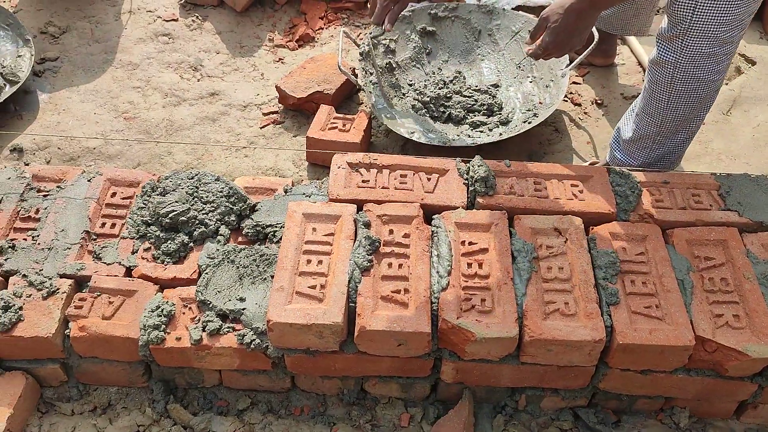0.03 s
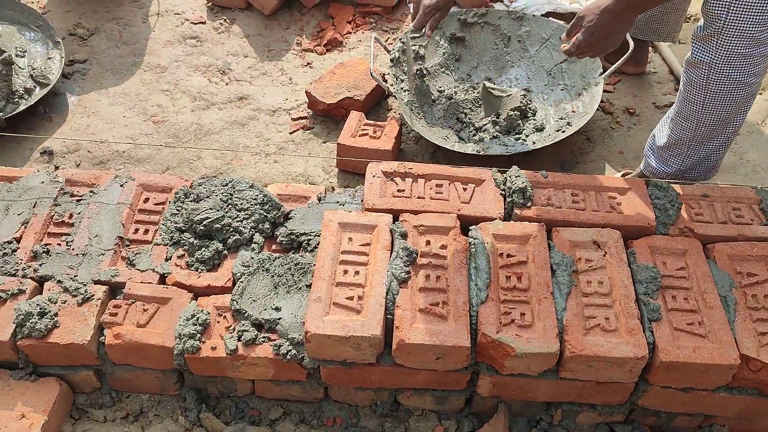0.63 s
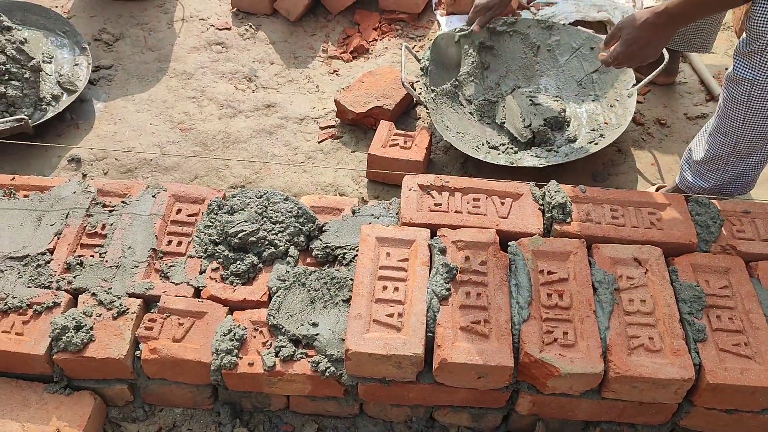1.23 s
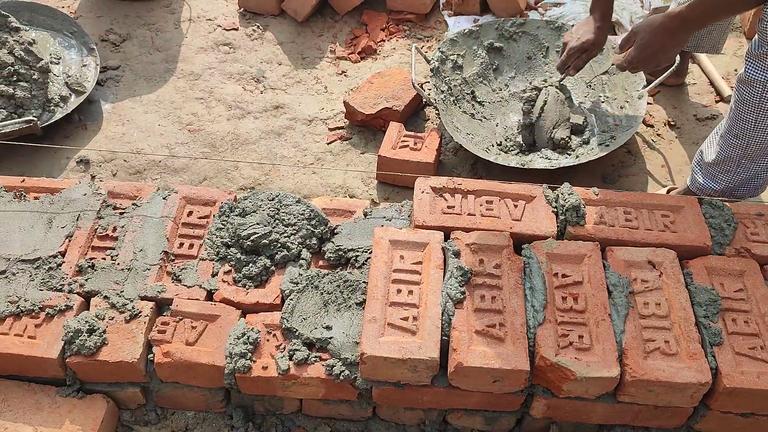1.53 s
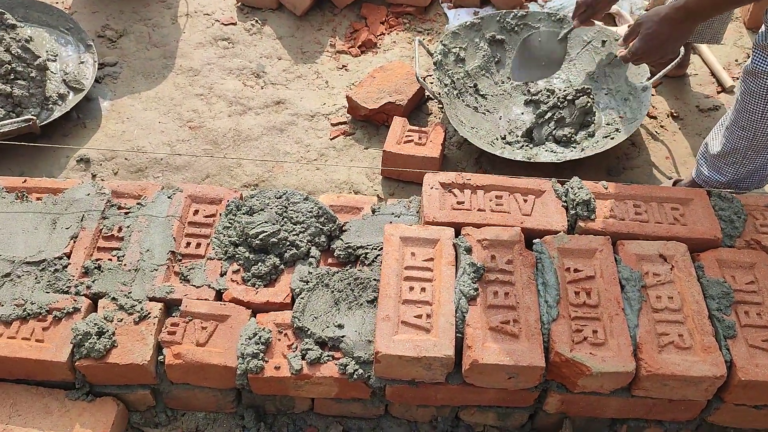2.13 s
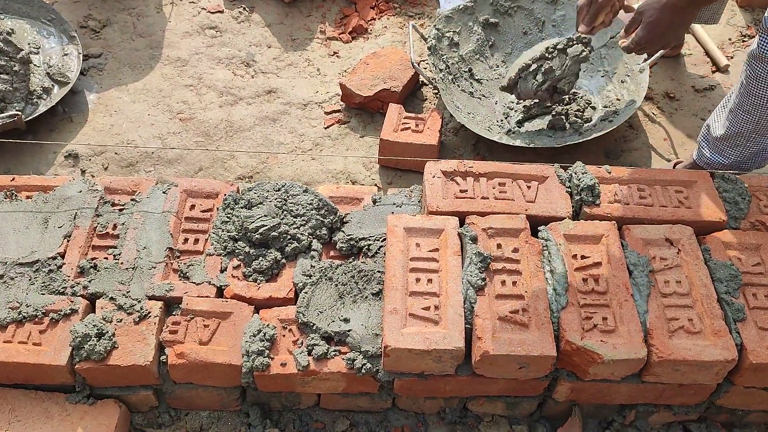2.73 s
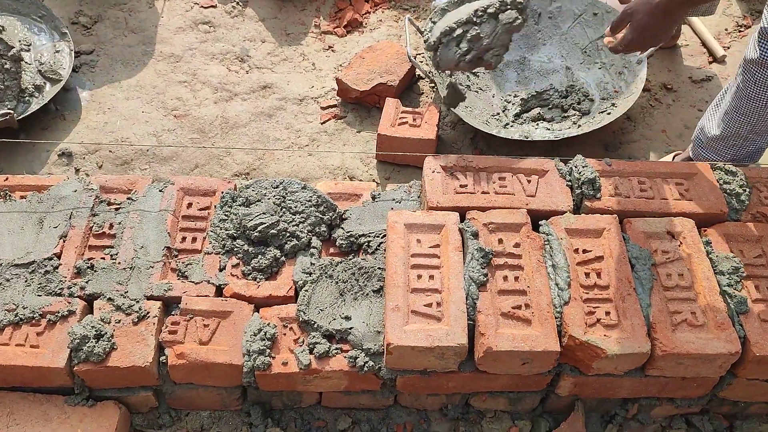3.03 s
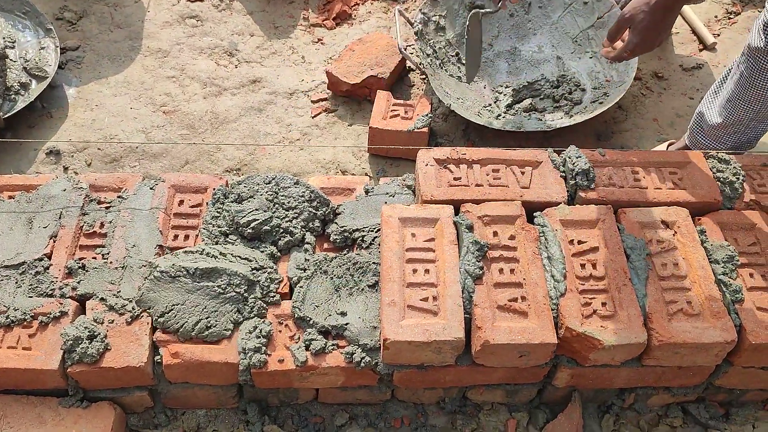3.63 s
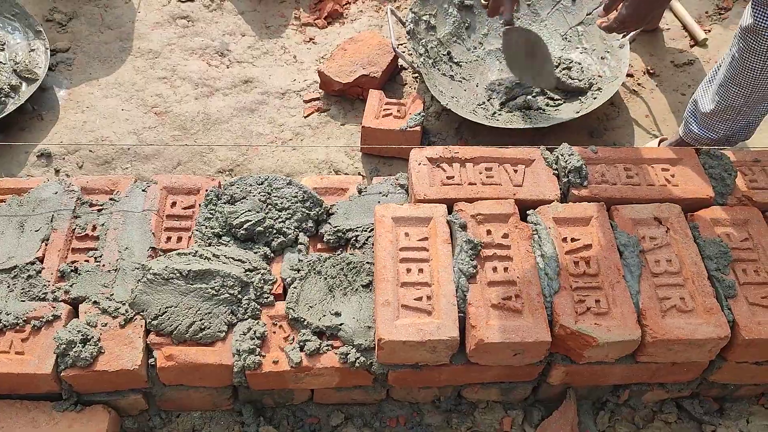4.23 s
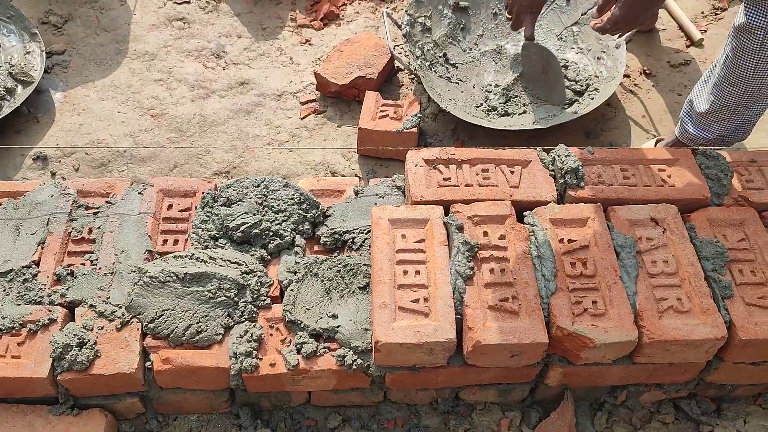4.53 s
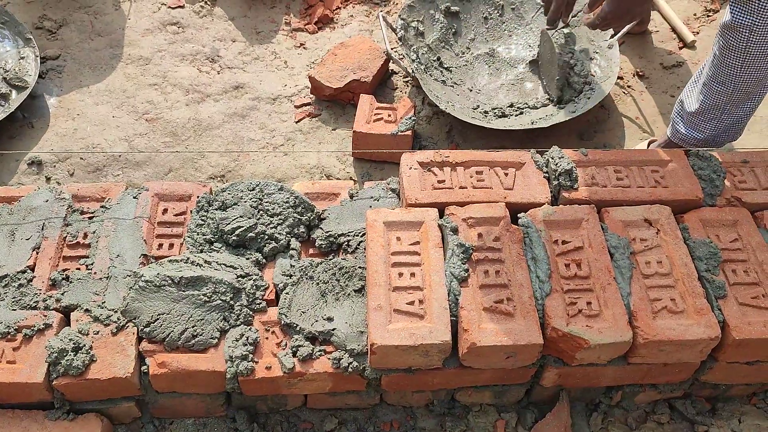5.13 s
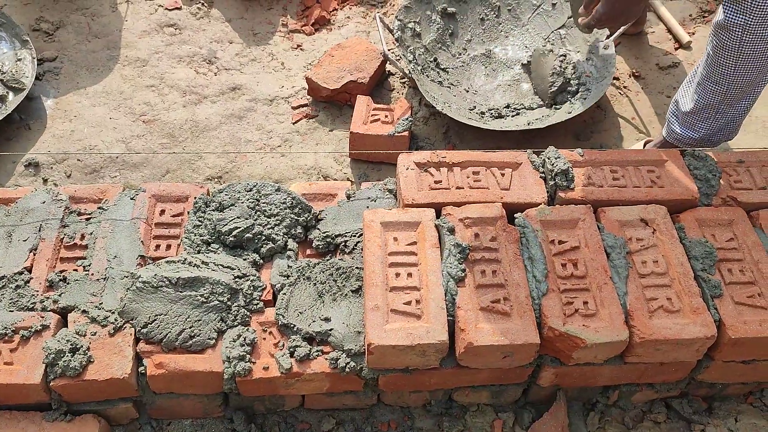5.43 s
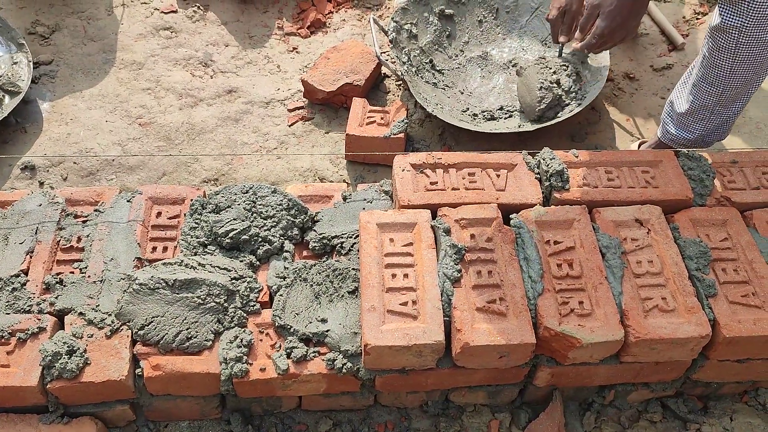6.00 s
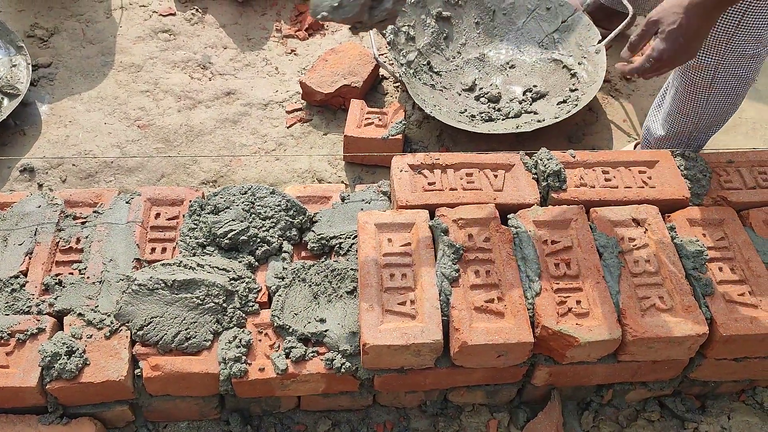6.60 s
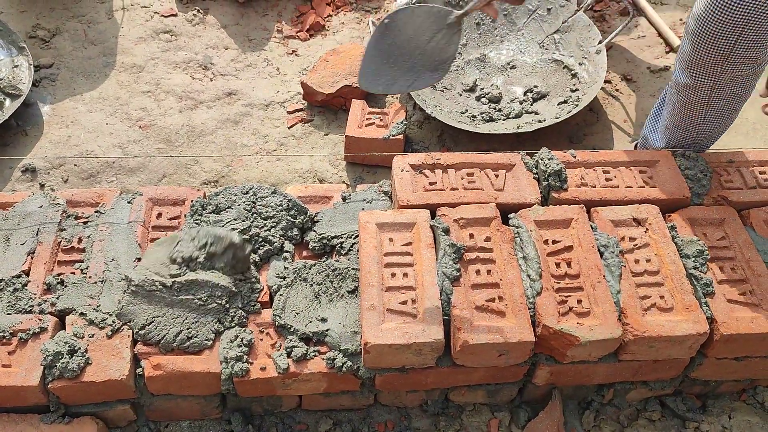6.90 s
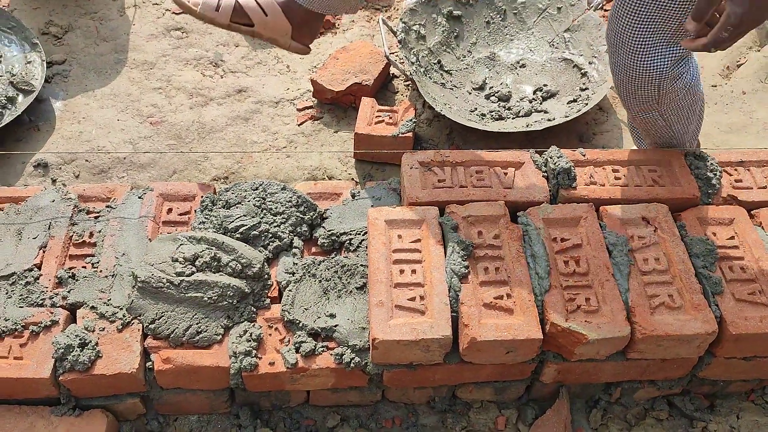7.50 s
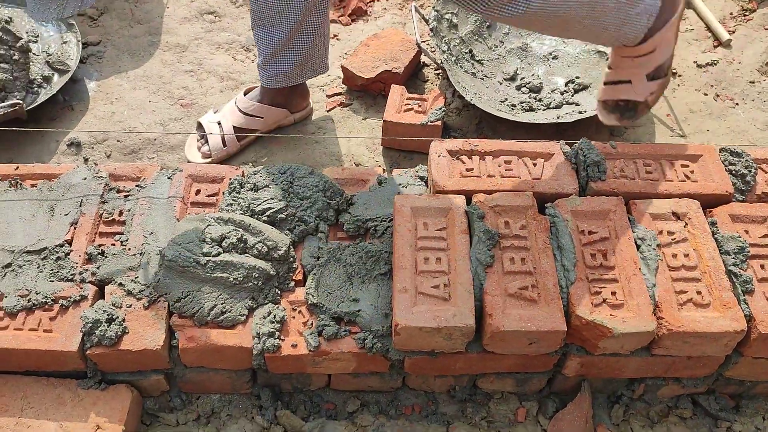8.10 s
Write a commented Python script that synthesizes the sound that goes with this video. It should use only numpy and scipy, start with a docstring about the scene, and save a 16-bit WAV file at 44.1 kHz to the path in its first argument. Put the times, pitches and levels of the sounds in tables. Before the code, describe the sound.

A faint rumble and hum of distant machinery runs throughout at an outdoor building site. Straight ahead, a metal trowel scrapes mortar in a steel pan with short, gritty strokes and tiny squeaks from 0.2 seconds. Near 0.9 seconds the pan knocks loudly, its rim ringing briefly, as wet mortar thuds down. A squeaky scrape follows at 1.4 seconds and a scrape with a soft thud at 2.3. The pan knocks again around 3.6, 3.9 and 4.4 seconds, and scrapes recur until 6 seconds.

From 4.5 seconds a second trowel, slightly left, taps a brick about every 0.4 seconds with sharp, ringing clinks and a short echo. These are loud until about 6.1 seconds, then lighter, ending at 7.6. Mortar plops softly around 6.3 seconds. Loose sand rustles faintly here and there, and a few quiet sandal steps come between 7.8 and 8.3 seconds.

```python
"""An outdoor building site: distant machinery rumbles, loose sand rustles and sandals step.
A mason scoops mortar from a steel pan. Wet mortar lands in damped thuds, knocks excite the modes of
the pan's bottom and rim, and stick-slip friction makes the trowel squeak and rasp over sand grains.
From the left a second trowel taps a brick again and again, each impact leaving its blade in free
vibration. Ground and brick stacks return a short reverberation."""
import sys
import numpy as np
from scipy import signal
from scipy.fft import rfft, irfft, next_fast_len
from scipy.io import wavfile
from scipy.ndimage import uniform_filter1d, map_coordinates

SR = 44100
rng = np.random.default_rng(int(sys.argv[2]) if len(sys.argv) > 2 else 0)


def to_wav(s):
    """Save 16-bit WAV."""
    ch = np.atleast_2d(s).T  # columns
    pcm = np.round(np.clip(ch, -1, 1) * 32767)  # PCM
    wavfile.write(sys.argv[1], SR, pcm.astype(np.int16))


N = 368235


def amp(db):
    """Amplitude ratio of a level in decibels."""
    return 10 ** (np.asarray(db) / 20)


def unit(x):
    """Normalisation to rms 1."""
    return x / np.sqrt(np.mean(x ** 2) + 1e-20)


def along(points, hz):
    """Interpolation of (f/Hz, value) points on a logarithmic frequency axis."""
    f, v = np.transpose(points)
    return np.interp(np.log(hz + 1), np.log(f + 1), v)


def add(track, s, sound):
    """Superposition of a sound on the track from time s."""
    i = round(s * SR)
    track[:, i:i + sound.shape[1]] += sound[:, :N - i]


def wobble(rate):
    """Smooth random modulation with rate knots a second."""
    return map_coordinates(rng.standard_normal(int(N * rate / SR) + 4), [np.arange(N) * rate / SR])


def filtered(x, response):
    """Linear filtering: the spectrum of x times a frequency response."""
    n = x.shape[-1]
    m = next_fast_len(n + 4096)
    return irfft(rfft(x, m) * response(np.fft.rfftfreq(m, 1 / SR)), m)[..., :n]


def band(x, lo_hz, hi_hz):
    """Band-pass filtering with soft edges, normalised to rms 1."""
    return unit(filtered(x, lambda f: ((1 + (lo_hz / (f + 1)) ** 8) * (1 + (f / hi_hz) ** 8)) ** -.5))


# Correlation between left and right: f/Hz, coefficient
CORRELATION = [(30, 0.71), (120, 0.93), (300, 0.86), (600, 0.8), (1200, 0.051), (2500, 0.05), (12000, 0.01)]
def stereo_angle(hz):
    """Correlation as the cosine of an angle between the two sides; returns half that angle."""
    return np.arccos(np.clip(along(CORRELATION, hz), -1, 1)) / 2


def spread(pair, spectrum):
    """Partial coherence: two independent signals, coloured and mixed with bass alike and treble apart."""
    def response(hz):
        angle = stereo_angle(hz)
        return amp(along(spectrum, hz)) * [np.cos(angle), np.sin(angle)]
    mid, side = filtered(pair, response)
    return unit(np.array([mid + side, mid - side]))


def noise(spectrum, size):
    """Spectrally shaped stereo noise of rms 1."""
    return spread(rng.standard_normal((2, size)), spectrum)


def blow(t, rise, t60):
    """Impact envelope: quick rise, exponential decay."""
    return (1 - np.exp(-t / rise)) * amp(-60 * t / t60)


def touch(t, length, t60, bite_s=0.0047):
    """Sustained excitation: linear onset, hold, exponential decay on release."""
    return np.clip(t / bite_s, 0, 1) * amp(-60 * np.maximum(t - length, 0) / t60)


def glide(t, length, peak_at, slowest):
    """Kinematics of a slide: progress from 0 to 1, and a speed that rises to 1 and falls again."""
    progress = np.clip(t / length, 0, 1)
    arch = np.sin(np.pi / 2 * np.interp(progress, [0, peak_at, 1], [0, 1, 0]))
    return progress, slowest + (1 - slowest) * arch ** 2


def ring(modes, t, scatter_db):
    """Free vibration: a sum of damped modes, the higher ones reaching the two sides out of phase."""
    out = np.zeros((2, len(t)))
    for hz, db, t60 in modes:
        apart = stereo_angle(hz) * rng.choice([-1, 1])
        phase = 2 * np.pi * rng.random() + np.array([[apart], [-apart]])
        pitch = hz * (1 + .004 * rng.standard_normal())  # grip and load detune each blow
        strength = amp(db + scatter_db * rng.standard_normal())
        out += strength * blow(t, 0.00068, t60) * np.sin(2 * np.pi * pitch * t + phase)
    return out


def grit(rate, size_db, t60):
    """Shot noise: sand grains crack at random, each exciting dense, short-lived modes."""
    impulses = (rng.random(N) < rate / SR) * rng.choice([-1, 1], N)
    grains = impulses * amp(size_db * np.minimum(rng.exponential(size=N), 4))
    out, size = np.zeros((2, N)), SR // 25
    t = np.arange(size) / SR
    for i in range(0, N, size):  # the contact moves on, and every spot has its own impulse response
        response = rng.standard_normal((2, size)) * amp(-60 * t / t60)
        add(out, i / SR, signal.fftconvolve(grains[None, i:i + size], response, axes=1))
    return unit(out)


# Reverberation time of the yard: f/Hz, T60/s
YARD_DECAY = [(200, 0.43), (2000, 0.25), (12000, 0.15)]
def yard(x):
    """Reverberation: ground and brick stacks scatter a diffuse tail whose treble decays first."""
    hz, t, z = signal.stft(rng.standard_normal((2, SR // 4)), SR, nperseg=256)
    envelope = blow(t, 0.016, along(YARD_DECAY, hz)[:, None])
    tail = signal.istft(z * envelope, SR, nperseg=256)[1]
    return signal.fftconvolve(x, tail / np.linalg.norm(tail[0]), axes=1)[:, :x.shape[1]]


# Spectral density of the ambient noise: f/Hz, level/dB
AMBIENT_SPECTRUM = [(12, -41), (20, 5), (77, 0.5), (133, -10), (170, -13.5), (481, -20.5), (615, -17.5),
                    (1400, -24), (2560, -21.5), (3190, -28.5), (5820, -34.5), (7060, -24.5), (8320, -36.5),
                    (12200, -32), (14000, -35)]
# Course of the rumble: t/s, level/dB
RUMBLE_LEVELS = [(0.0, -51), (0.83, -48.5), (2.44, -53), (3.16, -50.5), (7.93, -54.5), (8.35, -51)]
# Harmonics of a distant machine: f/Hz, level/dB re the rumble
HUM_HARMONICS = [(58.6, -3), (117.2, -5)]
def distant_machinery():
    """Tonal and broadband noise: machines hum and rumble under a faint, even hiss."""
    level_db = np.interp(np.arange(N) / SR, *np.transpose(RUMBLE_LEVELS))
    air = noise(AMBIENT_SPECTRUM, N)
    drifting_time = np.cumsum(1 + .015 * wobble(3.6)) / SR
    hum = sum(amp(db + 2.2 * wobble(4)) * np.sin(2 * np.pi * hz * drifting_time)
              for hz, db in HUM_HARMONICS)
    return amp(level_db) * (band(air, 13, 222) + hum) + amp(-61) * band(air, 167, 15100)


# Spectral density of sliding sand: f/Hz, level/dB
SAND_SPECTRUM = [(180, -38), (300, -1), (478, -8), (544, -7.5), (2310, -2), (4120, -10), (14000, -12.5)]
# Sand shifting under blade and feet: t/s, duration/s, level/dB
SAND_SLIDES = [(0.968, 0.098, -51.5), (1.274, 0.084, -52.5), (1.89, 0.09, -59.5), (2.245, 0.029, -48),
               (2.696, 0.14, -54), (2.851, 0.099, -51), (2.996, .012, -55.5), (3.334, 0.11, -54.5),
               (6.348, 0.15, -53), (6.667, 0.22, -58), (7.838, 0.4, -55)]
def sand_rustles():
    """Granular flow: loose sand gathers speed slowly, then settles."""
    flow, t = np.zeros((1, N)), np.arange(SR) / SR
    for s, length, db in SAND_SLIDES:
        _, speed = glide(t, length, peak_at=.95, slowest=0.76)
        add(flow, s, amp(db) * speed * touch(t, length, t60=0.26)[None])
    grains = spread(grit(rate=1200, size_db=3.0, t60=0.075), SAND_SPECTRUM)
    return flow * amp(1.53 * wobble(35)) * grains


# Mortar drops and footfalls: t/s, level/dB, relative push level/dB, relative splat level/dB
SOFT_IMPACTS = [(0.891, -8.5, -8, -4), (0.925, -6.5, -24, -13.5), (1.472, -19.5, -16, -6.5),
                (2.322, -15, -21, -11), (6.216, -37, -8, 5), (6.277, -19.5, -1, -10),
                (6.301, -14.5, -34, -9), (7.839, -34.5, -16, -11.5), (8.113, -24.5, -18.5, -17.5),
                (8.316, -28.5, -21, -18)]
def thuds():
    """Inelastic impact: a soft mass lands with a low push, a dull slap and a wet splat."""
    out, t = np.zeros((2, N)), np.arange(SR // 3) / SR
    for s, db, push_db, splat_db in SOFT_IMPACTS:
        puff = noise([(100, 0.5), (1000, 9), (10000, -34.0)], len(t))
        push = amp(push_db) * band(puff, 185, 250) * blow(t, 0.0028, 0.093)
        slap = amp(-11.5) * band(puff, 505, 637) * blow(t, 0.0013, 0.067)
        splat = amp(splat_db) * band(puff, 1800, 10600) * blow(t, 0.0028, 0.058)
        add(out, s, amp(db) * (push + slap + splat))
    return out


# Catches of the blade's edge: t/s, level/dB, f/Hz
EDGE_CATCHES = [(0.386, -25.5, 2650), (0.441, -29, 2610), (0.7582, -28, 6030), (1.3915, -12.5, 2900),
                (5.0823, -18.5, 2140), (6.4244, -38, 2380)]
def squeaks():
    """Stick-slip oscillation: the edge catches and gives a short, unsteady tone."""
    out, t = np.zeros((2, N)), np.arange(SR // 8) / SR
    for s, db, hz in EDGE_CATCHES:
        pitch = hz * (1 + .035 * wobble(500)[:len(t)])
        phase = 2 * np.pi * np.cumsum(pitch) / SR + np.array([[0], [1]])
        add(out, s, amp(db) * blow(t, .002, .05) * np.sin(phase))
    return out


# Spectral density of the pan's sheet, knocked or scraped: f/Hz, level/dB
SHEET_SPECTRUM = [(88, -44.5), (150, -23.5), (204, -17), (401, -5.5), (589, -2.5), (760, -6), (1050, -4),
                  (1300, -7), (1800, -6), (3030, -4), (4120, -10), (7350, -3), (9090, -10), (11500, -3),
                  (14200, -11), (15000, -74)]
# Modes of the pan's bottom, damped by mortar: f/Hz, level/dB, T60/s
BOTTOM_MODES = [(238, -23, 0.35), (292, -13, 0.095), (422, -7, 0.07), (590.6, -1.5, 0.078), (690, 3, 0.058),
                (773, -13.5, 0.086), (912, -11.5, 0.12), (1080, -2, 0.03)]
# Modes of the free rim: f/Hz, level/dB, T60/s
RIM_MODES = [(1745, -5.5, 0.19), (1895, -2.5, 0.27), (1960, -1.5, 0.29), (1973, -15, 0.29),
             (2740, -27.5, 0.26), (3650, -29.5, 0.2)]
# Knocks of the rocking pan: t/s, level/dB, relative rim level/dB, relative click level/dB
PAN_IMPACTS = [(0.204, -39, -24, 8), (0.758, -39, -24, 16), (0.8893, -7, -8, -5.5),
               (0.925, -18.5, -16, -28), (0.935, -10.5, -8, -31), (1.169, -22, -23, -25),
               (1.259, -23.5, -34, -28), (2.28, -23.5, -40, -16), (3.433, -31.5, -2.5, -28),
               (3.584, -8, -27.5, -31), (3.926, -18.5, -20.5, -28), (3.966, -27, -34, -19),
               (4.445, -17.5, -27, -19)]
def pan_knocks():
    """Impulsive excitation of a plate: the loaded bottom thumps, the rim rings, the contact clicks."""
    out, t = np.zeros((2, N)), np.arange(SR // 3) / SR
    for s, db, rim_db, click_db in PAN_IMPACTS:
        bottom = amp(-9.5) * ring(BOTTOM_MODES, t, scatter_db=2.3)
        rim = amp(rim_db) * ring(RIM_MODES, t, scatter_db=2.5)
        contact = noise(SHEET_SPECTRUM, len(t))
        bump = amp(-23.5) * band(contact, 380, 1300) * blow(t, 0.0013, 0.0516)
        click = amp(click_db) * band(contact, 1600, 12000) * blow(t, .0002, .014)
        add(out, s, amp(db) * (bottom + rim + bump + click))
    return out


def patchy(x, depth_db):
    """Position-dependent coupling: narrow resonances come and go as the contact point moves."""
    z = signal.stft(x, nperseg=512)[2]
    field = uniform_filter1d(rng.standard_normal(z.shape), size=3, axis=1)  # smooth in frequency
    field = uniform_filter1d(field, size=9, axis=2)  # and in time
    return unit(signal.istft(z * amp(depth_db * unit(field)), nperseg=512)[1][:, :x.shape[1]])


def sweep(x, centre_hz, gain_db, octaves):
    """Moving resonance: a spectral peak follows the blade's contact across the pan."""
    f, t, z = signal.stft(x, SR, nperseg=256)
    detuning = np.log2((f[:, None] + 1) / np.interp(t, np.arange(N) / SR, centre_hz)) / octaves
    return unit(signal.istft(z * amp(gain_db / (1 + detuning ** 2)), SR, nperseg=256)[1][:, :N])


# Trowel strokes: t/s, duration/s, time of top speed/duration, rasp level/dB, drag level/dB,
# hiss level/dB, initial resonance f/Hz, final resonance f/Hz
TROWEL_STROKES = [(0.201, 0.083, 0.57, -34, -39.5, -36.5, 1600, 1250),
                  (0.316, 0.083, 0.53, -39.5, -42.5, -41, 1300, 2530),
                  (0.423, 0.025, 0.87, -37.5, -80, -44.5, 2620, 2620),
                  (0.76, 0.13, 0.49, -31.5, -42, -30, 1600, 2080),
                  (1.36, 0.12, 0.48, -27.5, -45.5, -30.5, 2940, 1500),
                  (2.278, 0.067, 0.095, -29.5, -42.5, -36.5, 1080, 1485),
                  (2.349, 0.078, 0.17, -39.5, -60, -39, 1650, 2220),
                  (2.43, 0.1, .1, -53.5, -52.5, -54, 2530, 2240),
                  (3.472, 0.052, 0.27, -53, -54, -46.5, 1876, 1910),
                  (3.566, 0.027, 0.82, -34.5, -33.5, -43.5, 2300, 2750),
                  (3.965, .16, 0.32, -29, -32.5, -30, 1000, 1100),
                  (4.147, 0.019, 0.35, -30.5, -56, -43, 1060, 1060),
                  (4.442, 0.034, 0.23, -31.5, -30.5, -44, 1166, 1333),
                  (4.477, 0.13, 0.19, -29.5, -39.5, -27.5, 1300, 2400),
                  (4.978, 0.1, 0.2, -21.5, -40.5, -23, 1020, 2020),
                  (5.769, 0.14, 0.52, -32, -47.5, -30.5, 1390, 2440),
                  (5.911, 0.1, 0.47, -40, -39.5, -42, 2350, 2000)]
def trowel_scrapes():
    """Sliding friction: mortar drags, steel rasps and sand hisses, each growing as a power of speed."""
    drag, rasp, hiss = np.zeros((3, 1, N))
    centre_hz, t = np.ones(N), np.arange(SR // 2) / SR
    shed_db = 5  # the drag weakens over a stroke as mortar leaves the blade
    for s, length, fastest_at, rasp_db, drag_db, hiss_db, from_hz, to_hz in TROWEL_STROKES:
        progress, speed = glide(t, length, fastest_at, slowest=0.45)
        contact = touch(t, length, t60=0.12)[None]
        add(drag, s, amp(drag_db - shed_db * progress) * speed ** 0.19 * contact)
        add(rasp, s, amp(rasp_db) * speed ** 1.12 * contact)
        add(hiss, s, amp(hiss_db) * speed ** 1.02 * touch(t, length, t60=0.18)[None])
        centre_hz[round(s * SR):][:len(t)] = from_hz * (to_hz / from_hz) ** progress
    grains = grit(rate=2000, size_db=4.0, t60=0.029)
    sheet = spread(patchy(grains, depth_db=2.5), SHEET_SPECTRUM)
    steel = sweep(band(sheet, 930, 3500), centre_hz, gain_db=10.5, octaves=0.75)
    stick_slip = amp(1.37 * wobble(90))
    return (drag * band(sheet, 250, 760) + rasp * steel + hiss * band(sheet, 3770, 16000)) * stick_slip


# Spectral density of steel striking brick: f/Hz, level/dB
CLATTER_SPECTRUM = [(71, -53), (120, -15), (271, -21.5), (1070, -8.5), (1420, -9), (1990, 0.5), (2790, -8),
                    (3080, -6.5), (4320, -16.5), (7260, -10), (14000, -15)]
# Modes of the trowel blade: f/Hz, level/dB, T60/s
BLADE_MODES = [(1071, -2, .15), (1643, -17, .2), (2022, 0, .22), (2530, -8, .13), (2585, -15, .2),
               (3120, -5, .14), (3887, -1, .2), (4796, -5, .06), (5200, -14, .14), (5440, -3.5, .15),
               (5810, -11, .1), (6408, -6, .15), (6847, -10, .11), (7115, -7, .1), (7305, -7, .11),
               (8320, -13, .15), (8630, -4, .06), (9120, -9, .08), (9490, -10, .09), (10450, -9, .09),
               (11370, -7, .09), (11830, -9, .08), (12690, -9, .08), (13260, -8, .08)]
# Taps on the brick: t/s, level/dB, knock level/dB, treble level/dB, blade level/dB, ping f/Hz,
# ping level/dB, chatter duration/s; the levels of the parts are relative to the tap's
BRICK_IMPACTS = [(4.5358, -2, -13, -12.5, -24.5, 3340, -9, 0.0067),
                 (4.9294, 0, -18, -19, -25, 1973, -17.5, .0043),
                 (5.33, -6.5, -12, -9.5, -19.5, 3150, -7, 0.014),
                 (5.6964, -1.5, -17.5, -16.5, -28, 2184, -20.5, 0.0038),
                 (6.067, -0.5, -22, -15, -22.5, 1914, -14.5, 0.0063),
                 (6.123, -21, -23, -23, -15, 2080, -6, 0.0091),
                 (6.514, -11.5, -26, -19, -15, 2023, -8.5, 0.0097),
                 (6.9311, -14.5, -12.5, -8, -17, 1086, -13, 0.0096),
                 (6.973, -22.5, -15, -17, -24, 7300, -8, 0.0084),
                 (7.3363, -11, -9, -9.5, -12.5, 7280, -6, 0.012),
                 (7.352, -18, -23, -15, -10, 2050, 0, 0.0052),
                 (7.6239, -12, -12, -2.5, -22, 5000, -5, 0.0039)]
def brick_taps():
    """Hard impact: steel chatters, brick knocks, the blade rings; a faint, deep thump comes with it."""
    out, t = np.zeros((2, N)), np.arange(SR // 3) / SR
    soft_tap_db, ping_cycles = -17, 184  # treble level that gives no tilt; periods in the ping's T60
    for s, db, knock_db, treble_db, blade_db, ping_hz, ping_db, chatter_s in BRICK_IMPACTS:
        direct = noise(CLATTER_SPECTRUM, len(t))[:1]  # common to both sides
        burst = direct + 1.74 * noise(CLATTER_SPECTRUM, len(t))  # plus scatter off nearby bricks
        contact = (1 - np.exp(-t / 0.00074)) * amp(-60 * np.maximum(t - chatter_s, 0) / 0.05)
        clatter = amp(-16) * band(burst, 1400, 5300) + amp(treble_db) * band(burst, 4400, 18000)
        knock = amp(knock_db) * band(burst, 233, 856) * blow(t, 0.0025, 0.091)
        tilt = 0.32 * (treble_db - soft_tap_db)  # dB per octave: harder contact feeds the high modes
        modes = [(hz, level + tilt * np.log2(hz / 3000), t60) for hz, level, t60 in BLADE_MODES]
        blade = amp(blade_db) * ring(modes, t, scatter_db=1.6)
        favoured_mode = (ping_hz, 0, ping_cycles / ping_hz)
        ping = amp(ping_db) * ring([favoured_mode], t, scatter_db=4.3)
        thump = amp(-23.0) * band(rng.standard_normal((2, len(t))), 30, 48) * blow(t, 0.0037, 0.1)
        crack, clink = clatter * contact + knock, blade + ping
        reverberation = yard(amp(-15) * crack + amp(-9) * clink)
        add(out, s, amp(db) * (crack + clink + reverberation + thump))
    lag = round(.00047 * SR)  # the left side hears it first
    return np.array([amp(-2.2) * out[0], amp(-2.73) * np.roll(out[1], lag)])


def scene():
    """Superposition of the sources: the pan lies ahead, the brick is tapped to the left."""
    work = trowel_scrapes() + squeaks() + pan_knocks() + thuds()
    work_in_yard = work * amp([[.3], [-.3]]) + amp(-14.0) * yard(work)
    return work_in_yard + brick_taps() + sand_rustles() + distant_machinery()


def record(dry):
    """Band limiting: the microphone acts as a steep low-pass filter."""
    cutoff_hz = 14300
    return filtered(dry, lambda hz: (1 + (hz / cutoff_hz) ** 110) ** -.5)


dry = scene()
out = record(dry)
to_wav(out)
```